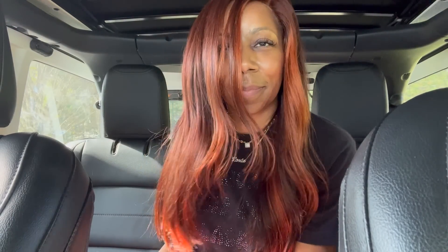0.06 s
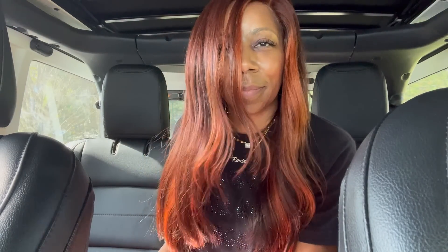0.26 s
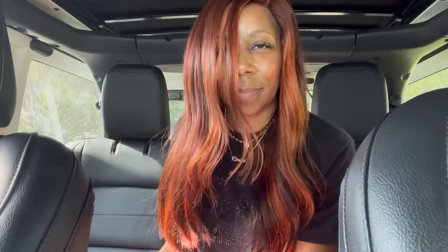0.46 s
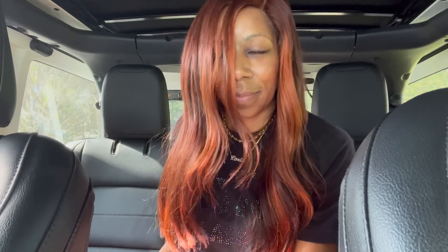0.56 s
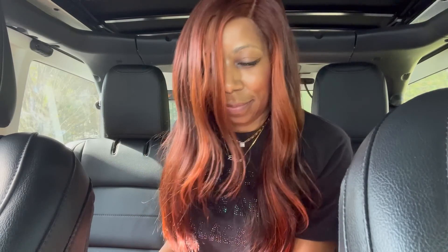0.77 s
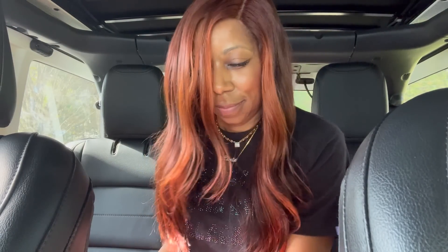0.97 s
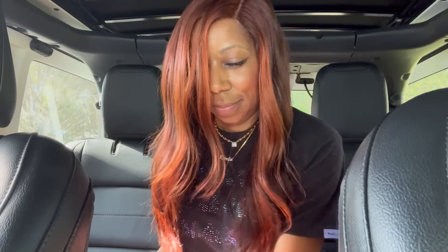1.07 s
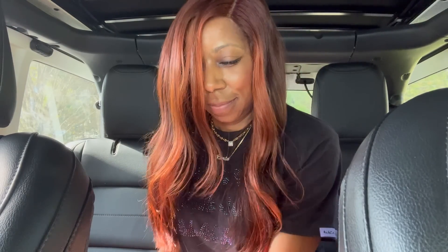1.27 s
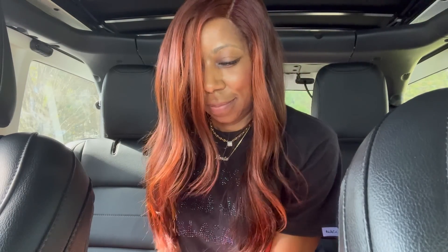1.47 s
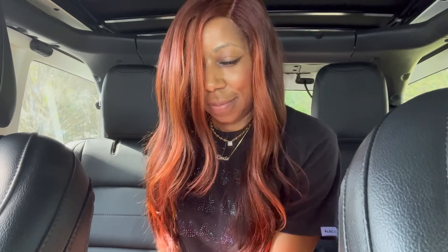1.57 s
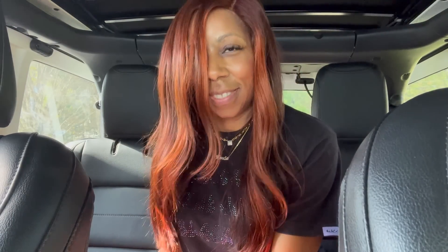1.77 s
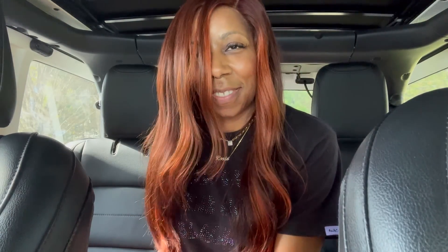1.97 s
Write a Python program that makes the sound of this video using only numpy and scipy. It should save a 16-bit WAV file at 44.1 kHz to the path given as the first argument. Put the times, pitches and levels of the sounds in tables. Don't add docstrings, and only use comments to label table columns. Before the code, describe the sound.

Inside a quiet parked car, sliding window glass hisses and stops with a dull low thump; sparse plastic ticks follow, then a click, a knock and a motor whine as it opens, captured in stereo by a phone.

```python
import sys
import numpy as np
from scipy import signal
from scipy.fft import rfft, irfft, next_fast_len
from scipy.io import wavfile

SR = 44100
rng = np.random.default_rng(int(sys.argv[2]) if len(sys.argv) > 2 else 0)


def waveform_to_disk(signal):
    frames = np.transpose(np.atleast_2d(signal))
    scaled = np.clip(frames, -1, 1) * 32767
    samples = np.round(scaled).astype(np.int16)
    wavfile.write(sys.argv[1], SR, samples)


def gain_from_db(level_db):
    decades = np.asarray(level_db, float) / 20
    return 10 ** decades


N = 88200


def rms_one(x):
    return x / np.sqrt(np.mean(x ** 2) + 1e-20)


def in_time(rows):
    times, *columns = np.transpose(rows)
    return [np.interp(np.arange(N) / SR, times, column) for column in columns]


def at_hz(points, hz):
    point_hz, values = np.transpose(points)
    return np.interp(np.log(hz + 1), np.log(point_hz), values)


def drift(rate):
    r = np.exp(-80 * np.pi * rate / SR)
    slow = signal.lfilter([1], [1, -2 * r, r * r], rng.standard_normal(N // 40 + 2002))[2000:]
    return np.interp(np.arange(N) / 40, np.arange(len(slow)), rms_one(slow))


def port_noise(size):
    # (frequency [Hz], correlation [0-1])
    likeness = [(40, .7), (110, .5), (280, .75), (450, .3), (750, .5), (5500, .25), (7500, .78),
                (11000, .92)]
    hz = np.fft.rfftfreq(size, 1 / SR)
    mid, side = rfft(rng.standard_normal((2, size)))
    alike = np.clip(at_hz(likeness, hz), 0, 1)
    return hz, np.sqrt(1 + alike) * mid + np.sqrt(1 - alike) * side * [[1], [-1]]


def patchy_noise(spectrum, patchy_db, rate):
    hz, white = port_noise(N)
    coloured = white * gain_from_db(at_hz(spectrum, hz)) * (hz > spectrum[0][0] / 2)
    out, together = 0, drift(rate / 2)
    for centre in 20 * 2. ** np.arange(11):
        octave = np.cos(np.pi / 2 * np.clip(np.log2((hz + 1) / centre), -1, 1)) ** 2
        swell_db = patchy_db * (0.39 * together + drift(rate))
        out = out + irfft(coloured * octave, N) * gain_from_db(swell_db)
    return rms_one(out)


def tone(hz, wobble_db, rate):
    turns = np.cumsum(hz * np.ones(N)) / SR + rng.random()
    return np.sqrt(2) * np.sin(2 * np.pi * turns) * gain_from_db(wobble_db * drift(rate))


def glass_in_felt():
    # (time [s], level [dB])
    closing = [
        (0, -50.5),
        (.03, -54),
        (.38, -53.5),
        (.415, -47.5),
        (.44, -49),
        (.475, -49),
        (.53, -76.5),
        (.6, -110),
    ]
    # (time [s], level [dB])
    opening = [
        (1.66, -114),
        (1.685, -50.5),
        (1.7, -52.5),
        (1.76, -51),
        (1.9, -52),
        (2, -50),
    ]
    # (frequency [Hz], density [dB per Hz])
    felt = [(250, -22), (600, -4.5), (1200, 0), (2500, 3), (4500, 1.5), (7000, 0.5), (12000, -3.5),
            (15800, -10.5)]
    slide = gain_from_db(in_time(closing)[0]) + gain_from_db(in_time(opening)[0])
    return slide * patchy_noise(felt, patchy_db=.6, rate=14.)


def cabin_air():
    # (frequency [Hz], density [dB per Hz])
    rumble = [(20, 1), (45, 7), (110, 3), (170, -9.5), (330, -9), (650, -17), (1000, -21.5), (1500, -51.5)]
    air = [(1200, 5.5), (2500, 2), (4000, -8.5), (6000, -12.5), (9000, -19), (12000, -58), (15500, -33)]
    # (time [s], level [dB])
    stir = [(0, -1), (.55, -5), (.8, -4), (.9, -3), (1.1, -4), (1.22, -6), (1.35, -3.5), (1.6, -2.5),
            (2, -6.5)]
    low = gain_from_db(-35.5) * patchy_noise(rumble, patchy_db=.8, rate=8.)
    hiss = gain_from_db(-54 + in_time(stir)[0]) * patchy_noise(air, patchy_db=1.7, rate=6.)
    return low + hiss


def hum():
    # (multiple of the drone, level [dB], pan [dB])
    partials = [(1, -43, -5.5), (2, -43.5, 1), (3, -55, -10), (4, -47, -6.5)]
    drone_hz, out = 70.52, 0
    for multiple, db, pan in partials:
        port_db = db + pan * np.array([[.5], [-.5]])
        out = out + gain_from_db(port_db) * tone(multiple * drone_hz, wobble_db=2.0, rate=17.0)
    return out


def ticks(events, rings):
    out, size = np.zeros((2, N + SR)), 12000
    t = np.arange(size) / SR
    for s, db, centre_hz, width, t60 in events:
        hz, white = port_noise(size)
        octaves = np.log2((hz + 1) / centre_hz)
        colour = np.exp(-.5 * (octaves / width) ** 4) * (centre_hz / (hz + 300)) ** .6
        for ring_hz, ring_db in rings:
            off_ring = (hz - ring_hz) / (50 + .015 * ring_hz)
            colour = colour * (1 + gain_from_db(ring_db + 2 * rng.normal()) / (1 + off_ring ** 2))
        shape = (1 - np.exp(-t / 0.0007)) * (gain_from_db(-60 * t / t60) + 0.55 * gain_from_db(-60 * t / .025))
        start = int(s * SR)
        out[:, start:start + size] += gain_from_db(db) * rms_one(irfft(white * colour, size)) * shape
    return out[:, :N]


def trim_panel():
    # (time [s], level [dB], centre [Hz], width [octaves], t60 [s])
    panel = [
        (.049, -42.5, 1690, 1.6, 0.11),
        (.155, -53.5, 1500, 1.8, 0.3),
        (.660, -47.5, 2000, 1.27, 0.17),
        (.927, -50, 2370, 0.9, 0.14),
        (1.035, -55.5, 2000, 0.62, 0.13),
        (1.163, -47.5, 1830, 1.2, 0.13),
        (1.27, -56, 2000, 0.61, .12),
    ]
    # (frequency [Hz], level over the snap [dB])
    panel_rings = [(920, 17), (2000, 8), (3450, 9), (3900, 10), (4600, 2)]
    return ticks(panel, panel_rings)


def whine(run):
    overtones_db = [0, -21, -21]
    hz, db = in_time(run)
    t = np.arange(N) / SR
    running = (t > run[0][0]) & (t <= run[-1][0])
    partials = [gain_from_db(d) * tone((k + 1) * hz, wobble_db=1.1, rate=25.) for k, d in enumerate(overtones_db)]
    return running * gain_from_db(db) * sum(partials)


def motor():
    # (time [s], commutator tone [Hz], level [dB])
    closing_run = [
        (.1, 788, -72),
        (.16, 792, -64),
        (.3, 792, -80),
        (.38, 740, -91),
    ]
    opening_run = [
        (1.715, 765, -61),
        (1.75, 786, -45.5),
        (1.84, 785, -45.5),
        (1.95, 793, -47),
        (2, 806, -51),
    ]
    return whine(closing_run) + whine(opening_run)


def strike(clicks, modes, spread_db):
    out = np.zeros((2, N))
    for k, (hz, db, t60) in enumerate(modes):
        r = gain_from_db(-60 / (min(t60, 45 / hz) * SR))
        w = 2 * np.pi * hz / SR
        lean_db = spread_db * rng.uniform(-1, 1)
        for port, sign in enumerate([1, -1]):
            phase = .45 * sign * (-1) ** k
            onset, ring = [np.sin(phase), r * np.sin(w - phase)], [1, -2 * r * np.cos(w), r * r]
            out[port] += gain_from_db(db + sign * lean_db) * signal.lfilter(onset, ring, clicks + 1e-18)
    return out


def door():
    # (time [s], level [dB], contact [s])
    pushes = [(0.452, -25, 0.0027), (0.4633, -22.5, 0.00077), (.471, -20, 0.00081), (0.486, -26, 0.0019),
              (0.496, -18, 0.0038), (.51, -24, 0.0023), (.535, -27.5, 0.0054), (0.557, -30.5, 0.0039),
              (1.646, -36.5, 0.00088), (1.706, -25, 0.0038), (1.728, -25, 0.0041), (1.735, -28, 0.0037),
              (1.755, -21.5, 0.0052), (1.79, -28, 0.0058), (1.819, -33.5, 0.0088)]
    # (frequency [Hz], level [dB], t60 [s])
    shell = [(50, 0.5, 0.39), (70.1, 0, 0.21), (93.1, -2, 0.24), (130.8, 4, 0.14), (164.2, -7, 0.16),
             (185.6, 3, 0.16), (262.6, 1, 0.072), (297, -7, 0.09), (349, -5.5, 0.1), (421, -4, 0.15),
             (480, -10, 0.099), (566, -7.5, .05)]
    t, force = np.arange(N) / SR, np.zeros(N)
    for s, db, contact in pushes:
        u = np.clip((t - s) / (2 * contact), 0, 1)
        force += gain_from_db(db) * np.sin(np.pi * u) ** 2 / (contact * SR)
    return strike(force, shell, spread_db=.8)


def knocks():
    # (time [s], level [dB], centre [Hz], width [octaves], t60 [s])
    blows = [
        (.459, -40, 450, 2.12, 0.26),
        (1.53, -45, 443, 0.48, 0.59),
        (1.633, -31.5, 1110, 0.77, 0.2),
        (1.676, -43, 1470, 1.1, 0.13),
        (1.687, -36, 410, 0.75, 0.3),
    ]
    return ticks(blows, [])


def switch():
    # (time [s], level [dB], centre [Hz], width [octaves], t60 [s])
    presses = [
        (.8205, -48, 4550, 3.6, 0.13),
        (1.585, -53, 2480, 1.8, 0.06),
        (1.620, -41, 5430, 2.4, 0.15),
    ]
    # (frequency [Hz], level over the snap [dB])
    switch_rings = [(1560, 5.9), (3050, 3.7), (4900, 2.4), (6600, 2.3), (10100, 6.1), (11700, 4.3)]
    return ticks(presses, switch_rings)


def trim_clip():
    # (time [s], level [dB], centre [Hz], width [octaves], t60 [s])
    clip = [
        (1.076, -56.5, 5000, 2.2, 0.16),
        (1.367, -40.5, 3240, 1.67, .13),
        (1.398, -54, 3200, 0.97, 0.05),
    ]
    clip_rings = [(1200, 17), (2040, 8), (2900, 6), (3350, 9), (4530, 9), (5870, 13), (10200, 4)]
    return ticks(clip, clip_rings)


def gears():
    # (time [s], level [dB])
    chatter = [
        (1.632, -22),
        (1.674, -30),
    ]
    # (frequency [Hz], level [dB], t60 [s])
    gearbox = [(270, 0, .09), (390, -8, .04), (525, -4, .06), (790, -5, .035), (1060, 0, .04),
               (1270, 2, .035), (1570, -8, .03), (1800, -9, .03), (2000, -5, .035)]
    tooth_hz, tooth_loss_db = 263, 7
    clicks, tooth = np.zeros(N), np.arange(5)
    for s, db in chatter:
        times = s + (tooth + .12 * rng.normal(size=5)) / tooth_hz
        clicks[(times * SR).astype(int)] = gain_from_db(db - tooth_loss_db * abs(tooth - 1.5))
    softened = signal.lfilter([.3], [1, -.7], clicks)
    return strike(softened, gearbox, spread_db=2.)


def scene():
    room = cabin_air() + hum()
    window = glass_in_felt() + motor() + door() + knocks() + gears()
    small_parts = trim_panel() + switch() + trim_clip()
    return room + window + small_parts


def roll_off(x):
    return signal.sosfilt(signal.butter(12, 15900, fs=SR, output="sos"), x)


def record(dry):
    # (frequency [Hz], left minus right [dB])
    balance = [(200, 0), (2200, -1.5), (4500, -5), (6000, -3), (8000, 0.5)]
    # (frequency [Hz], lag [half turns])
    trail = [(0, 0), (330, -.1), (620, .65), (1300, .25), (2000, 1.05), (2600, 1.2), (3200, 2), (4300, 3),
             (5500, 3.9), (6700, 4.9), (8300, 5.02), (10800, 5.93), (12500, 6.05), (14500, 6.93),
             (22050, 7.2)]
    size = next_fast_len(N + 4096)
    hz = np.fft.rfftfreq(size, 1 / SR)
    lag = np.exp(-1j * np.pi * np.interp(hz, *np.transpose(trail)))
    half_db = at_hz(balance, hz) / 2
    ports = np.array([gain_from_db(half_db), gain_from_db(-half_db) * lag])
    x = irfft(rfft(dry, size) * ports, size)[:, :N]
    x = signal.sosfilt(signal.cheby2(12, 60, 16300, fs=SR, output="sos"), x)
    x = signal.sosfilt(signal.butter(2, 24, "high", fs=SR, output="sos"), x)
    return roll_off(x)


dry = scene()
out = record(dry)
waveform_to_disk(out)
```